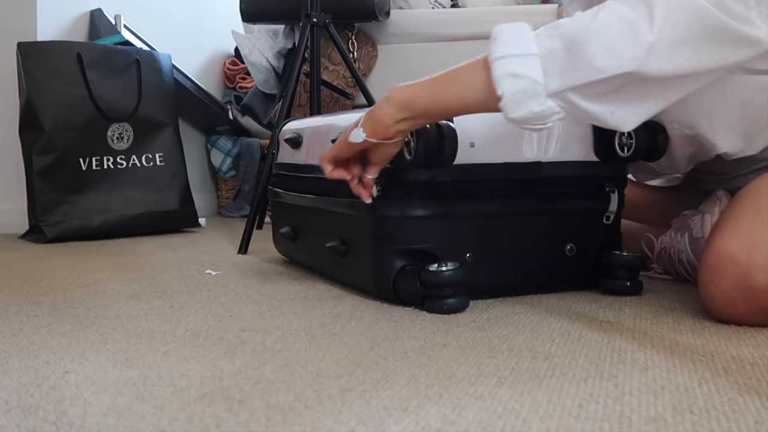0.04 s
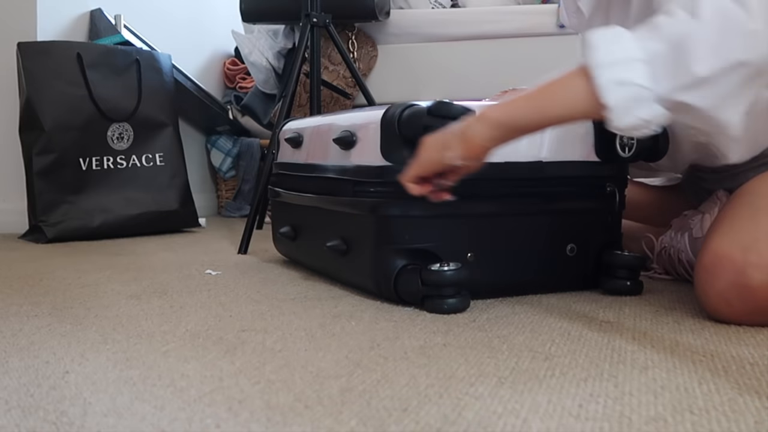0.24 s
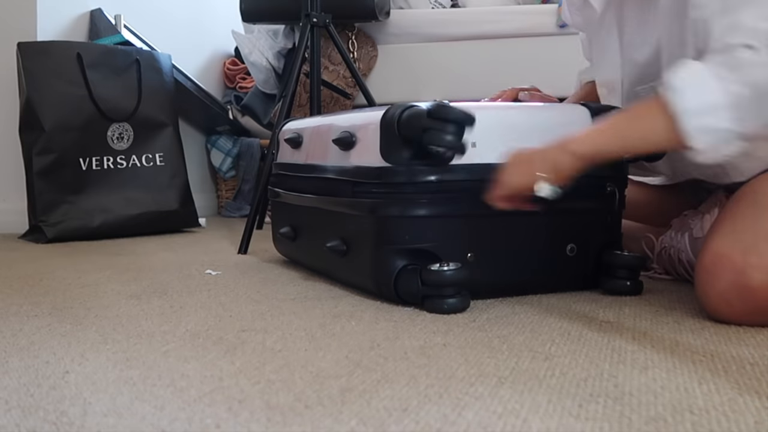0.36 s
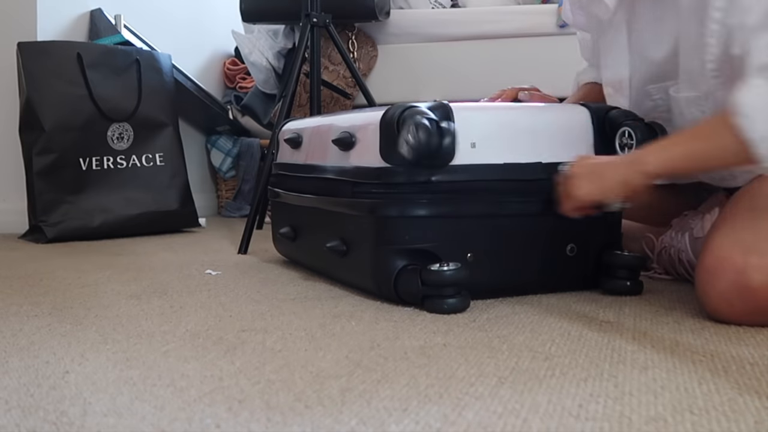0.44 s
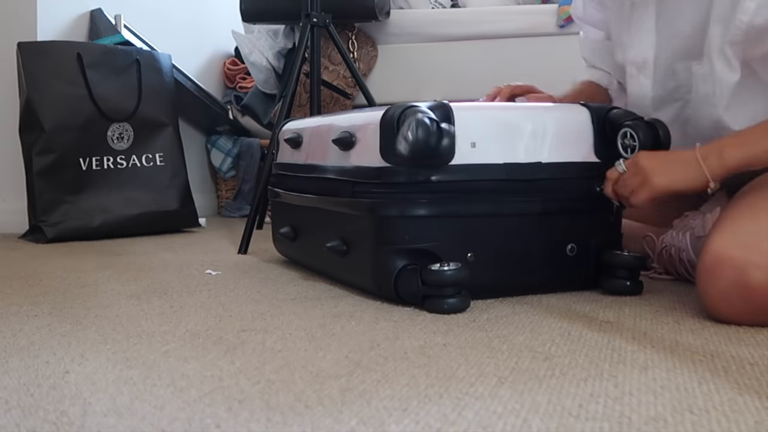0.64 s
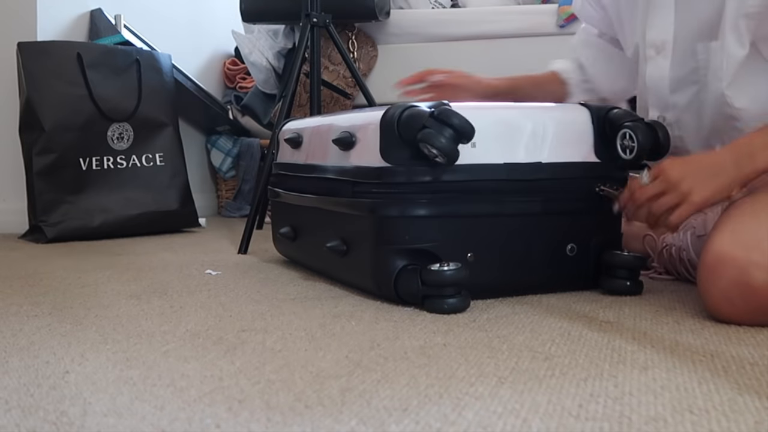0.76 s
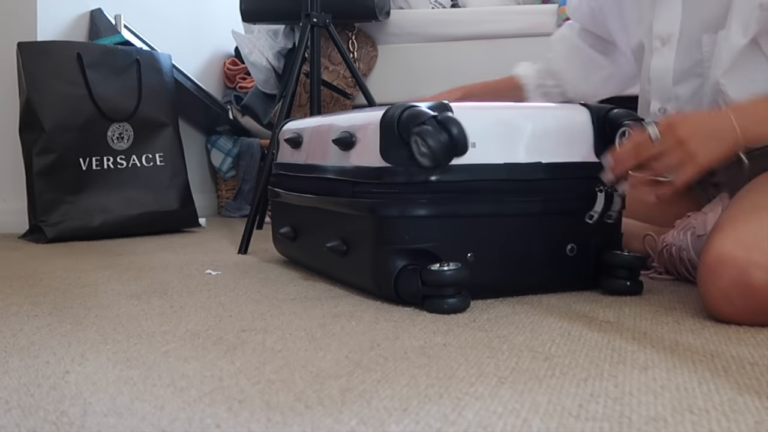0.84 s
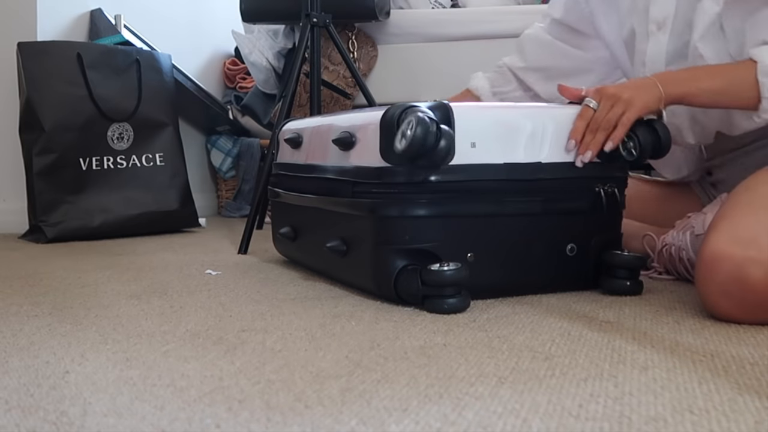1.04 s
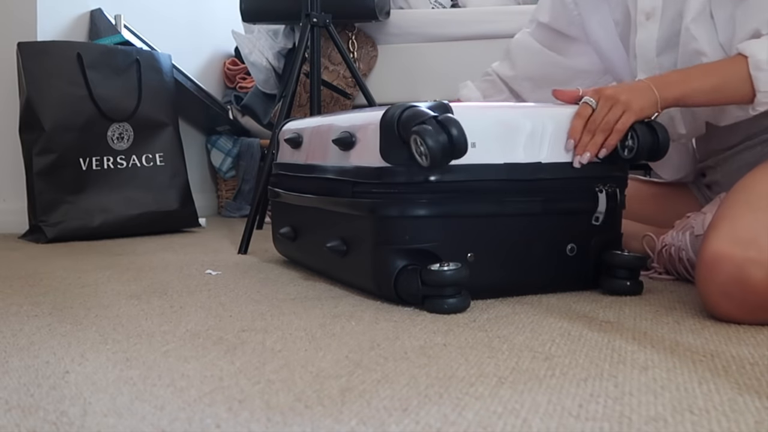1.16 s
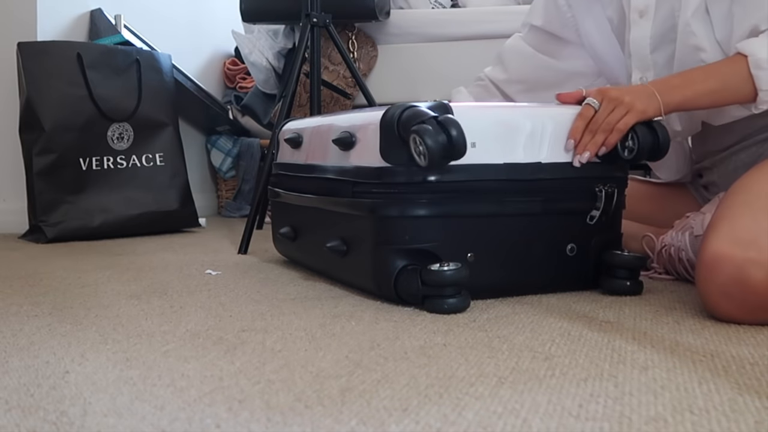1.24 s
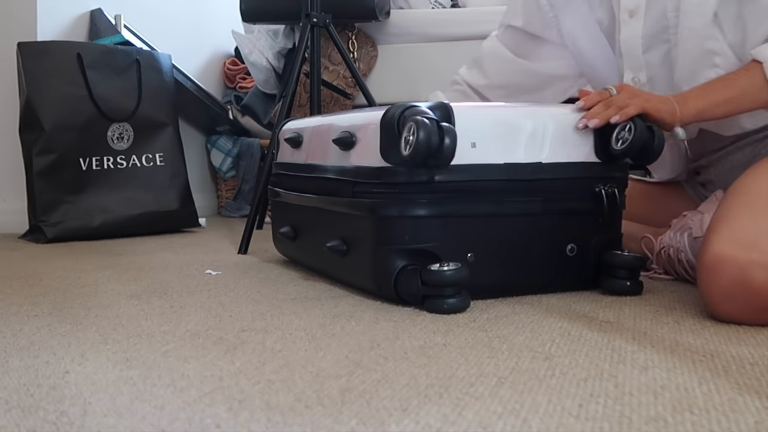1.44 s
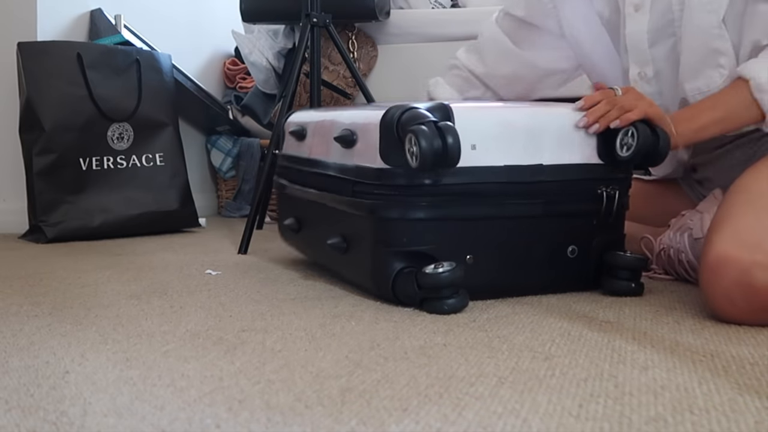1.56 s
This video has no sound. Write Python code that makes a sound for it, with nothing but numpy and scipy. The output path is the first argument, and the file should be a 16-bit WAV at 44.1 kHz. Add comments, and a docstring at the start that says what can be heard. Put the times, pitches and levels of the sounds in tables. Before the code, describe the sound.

Close up in a small room, a hard-shell suitcase is zipped with a short, hollow rasp that speeds up twice. Light knocks, rubbing and a clink of the pull follow, ending with a brief wheel rattle.

```python
"""A hard-shell suitcase lies on the carpet of a small furnished room. A hand brushes and taps it,
and the metal pull of its zipper clinks. The slider then runs round the case in two quick surges,
tripping over the teeth: this periodic forcing makes the hollow shell sing at the tooth rate, while
the tape rasps. Afterwards hands bump, tap and rub the case, the pull clinks again, and last a
knocked wheel rattles. The room answers with a short reverberation."""
import sys
import numpy as np
from scipy import signal
from scipy.fft import rfft, irfft
from scipy.io import wavfile
from scipy.ndimage import uniform_filter1d

SR = 44100
rng = np.random.default_rng(int(sys.argv[2]) if len(sys.argv) > 2 else 0)


def wav_record(signal):
    """Record a signal, one row per channel, as 16-bit PCM in the file named by sys.argv[1]."""
    frames = np.transpose(np.atleast_2d(signal))
    bounded = np.clip(frames, -1, 1)
    # unit amplitude maps onto the largest positive 16-bit level
    quanta = np.round(bounded * 32767).astype(np.int16)
    wavfile.write(sys.argv[1], SR, quanta)


N = 70560

# Speed of the slider. Each row: time in seconds, teeth per second.
SLIDER_SPEED = [(0.24, 211), (0.272, 249), (0.33, 206.6), (0.362, 243), (0.385, 333), (0.413, 464),
                (0.441, 467), (0.449, 693), (0.466, 690), (0.485, 775), (0.503, 682), (0.526, 505),
                (0.545, 345), (0.568, 323), (0.589, 560), (0.604, 490), (0.62, 335), (0.68, 237)]
# Force of the pull. Each row: time in seconds, then relative levels in dB of buzz, overtones and rasp.
PULL_FORCE = [(0.235, -48, -13, -36.5), (0.27, -27, -1.5, -43.5), (0.32, -27, 4.5, -43),
              (0.355, -22, 1.5, -43), (0.372, -17.5, 5.5, -40), (0.43, -16.5, 1.5, -40),
              (0.445, -17, 9.5, -32), (0.462, -11, 3.5, -27), (0.485, -14, 7.5, -32), (0.52, -18.5, 5, -30),
              (0.565, -19, -6, -35), (0.594, -13.5, 4, -27), (0.612, -19, -2, -33), (0.64, -29, -3, -40),
              (0.70, -58, 16, -57)]
# Spectra of a passing tooth and of the scraped tape. Each row: frequency in Hz, relative level in dB.
TOOTH_SPECTRUM = [(60, -25), (130, -3.5), (220, 3.5), (330, 0), (430, -1.5), (540, 7), (750, -3.5),
                  (970, 0), (1200, -22.5), (1550, -15.5), (1900, -35.5), (4000, -31), (8000, -79)]
RASP_SPECTRUM = [(100, -1.5), (900, 3), (1600, 6), (2200, 1.5), (3250, -5), (4100, -1.5), (5100, -17),
                 (7500, -17.5), (11000, -31)]
# Resonances that colour the zipper and the knocks. Each row: frequency in Hz, relative level # in dB.
RESONANCES = [(102, 4), (190, 5), (269, 14.5), (335, 9.5), (466, -0.5), (653, 7.5), (753, -11), (963, -7)]

# Clinks of the pull. Each row: start in seconds, level in dB, pitch in Hz, tilt in dB per octave.
CLINK_EVENTS = [(0.2079, -19.5, 2820, -10), (0.2246, -1.5, 2717, -14), (0.2712, -19, 2520, -0.5),
                (1.035, -29, 2505, -3), (1.0494, -14, 2510, 1), (1.0706, -16, 2466, 12.5)]
# Modes of the pull. Each row: multiple of the pitch, relative level in dB, T60 in seconds.
PULL_MODES = [(1.0, 0, 0.0081), (1.1, -7.5, 0.0016), (1.43, -14.5, 0.021), (4.4, -32, 0.0016)]
# Taps of slider, fingers and ring on the plastic.
# Each row: start in seconds, knock level in dB, snap level in dB, pitch of the struck spot in Hz.
TAP_EVENTS = [(0.0363, -12, -27, 1010), (0.2252, -5, -5.5, 2250), (0.626, -7, -5, 3540),
              (0.6512, -1.5, -16.5, 1970), (0.7065, -9.5, -15, 2180), (0.772, -1.5, -15.5, 1700),
              (0.779, -10, -9.5, 2880), (0.882, -20, -22.5, 3280), (0.946, -5.5, -8.5, 1450),
              (0.966, -15.5, -16, 1530), (1.0703, -4.5, -16, 1030), (1.081, -14, -18, 3460),
              (1.093, -13, -14, 2320), (1.131, -19, -15.5, 2870), (1.173, -15, -25, 935),
              (1.329, -19.5, -20.5, 1456), (1.372, -18, -13.5, 1900), (1.4967, -15, -18, 1550),
              (1.5141, -22, -6.5, 2550)]
# Spectra of a tap's knock and snap. Each row: frequency in Hz, relative level in dB.
KNOCK_SPECTRUM = [(50, -13.5), (200, -6), (450, 4.5), (800, 0), (1500, -8), (6000, -30), (15000, -46.5)]
SNAP_SPECTRUM = [(200, -11), (1000, 2.5), (1800, 4.5), (2600, -5), (4000, 1), (5200, -12.5), (8000, -10),
                 (15000, -54)]
# Soft bumps of the case. Each row: start in seconds, pitch in Hz, level in dB, T60 in seconds.
BUMP_EVENTS = [(0.513, 119.5, -21, 0.1), (0.608, 66, -23.5, 0.11), (0.626, 171.4, -30, 0.31),
               (0.775, 134, -30, 0.2), (0.789, 97.2, -30, 0.17), (0.946, 261, -16, 0.025),
               (0.947, 97, -26, 0.23), (1.009, 194, -15.5, 0.058), (1.021, 311, -17.5, 0.05),
               (1.032, 97.2, -23, 0.12), (1.038, 178.4, -19.5, 0.1)]
# Modes of a wheel. Each row: frequency in Hz, relative level in dB.
WHEEL_MODES = [(1350, -10), (1850, 3), (2520, 2)]
# Hands, sleeve and pull sliding over the case.
# Each row: start in seconds, length in seconds, level in dB, tilt in dB per octave.
RUB_EVENTS = [(0.029, 0.091, -45, -3.5), (0.194, 0.23, -40.5, -4), (0.235, 0.035, -44.5, 4),
              (0.696, 0.075, -43, -1), (0.996, 0.21, -45, -1.5), (1.066, 0.098, -38, -1),
              (1.299, 0.06, -48, -5), (1.366, 0.092, -47.5, 9.5), (1.427, 0.046, -45, 5.5),
              (1.468, 0.098, -45, 5.5)]
# Spectra of the rubbing and of the room tone. Each row: frequency in Hz, relative level in dB.
RUB_SPECTRUM = [(60, -3.5), (200, 5), (600, 9), (1200, 2), (2500, -0.5), (4200, -9.5), (5900, -11),
                (9000, -32), (15000, -73)]
ROOM_TONE_SPECTRUM = [(50, -8.5), (100, 3.5), (190, -1), (300, -6.5), (1200, -18), (10000, -33),
                      (15000, -46)]

# Decay of the room. Each row: frequency in Hz, T60 in seconds.
ROOM_DECAY = [(100, 0.47), (500, 0.24), (8000, 0.19)]
# Early reflections from furniture and wall. Each row: delay in seconds, level in dB.
REFLECTIONS = [(0.0035, -22), (0.0114, -18.5)]
# Balance of the microphone pair. Each row: frequency in Hz, left minus right in dB.
PAIR_BALANCE = [(150, 0), (700, -1.5), (8000, -0.5)]


def zipper(even_above_hz=350, tooth_db_per_octave=-6):
    """Forced vibration: one pulse per tooth drives the shell, so the pitch follows the slider's speed."""
    t = np.arange(N) / SR
    rate, = curve(SLIDER_SPEED)
    buzz_db, overtone_db, rasp_db = curve(PULL_FORCE)
    moving = uniform_filter1d(1. * (t > PULL_FORCE[0][0]) * (t < PULL_FORCE[-1][0]), size=300)
    # The hand's speed, and below its force, waver as the tape catches.
    teeth = np.cumsum(rate * (1 + 0.028 * waver(size=150))) / SR
    # Teeth scatter in timing and strength; a fast slider runs more evenly.
    slowness = 1 / (1 + (rate / even_above_hz) ** 6)
    shift, height = (np.interp(teeth, np.arange(len(v)), v) for v in rng.standard_normal((2, N // 20)))
    teeth += shift * np.interp(slowness, [0, 1], [0.021, 0.074])
    force = amp(np.tanh(height) * np.interp(slowness, [0, 1], [-1.5, 9.5]))
    phase = 2 * np.pi * teeth
    overtones = sum(amp(tooth_db_per_octave * np.log2(k / 2)) * np.cos(k * phase) for k in range(2, 7))
    pulses = force * (np.cos(phase) + amp(overtone_db) * overtones)
    buzz = steady(resonate(colour(pulses, TOOTH_SPECTRUM))) * amp(buzz_db + 1.5 * waver())
    return moving * (buzz + amp(rasp_db + 1.22) * tape_rasp(teeth))


def tape_rasp(teeth, grain_db=1, steady_share=0.75, decay_teeth=0.29):
    """Stick-slip friction: noise that catches every millisecond or so, with a puff at each tooth."""
    noise = rng.standard_normal(N)
    grain = amp(grain_db * unit(uniform_filter1d(rng.standard_normal(N), 50)))
    puffs = steady_share + (1 - steady_share) * np.exp(-(teeth % 1) / decay_teeth)
    return unit(colour(noise * grain * puffs, RASP_SPECTRUM))


def resonate(drive, t60_s=0.16, ring_db=-11):
    """Resonance: a set of damped modes adds its ringing to the drive."""
    t = np.arange(SR // 2) / SR
    decay = amp(-60 * t / t60_s)
    modes = sum(amp(db) * np.cos(2 * np.pi * hz * t) for hz, db in RESONANCES)
    response = modes * decay * 2 / decay.sum()
    return drive + amp(ring_db) * signal.fftconvolve(drive, response)[:N]


def clinks(rise_s=0.00014):
    """Free vibration: the pull strikes the slider and rings for milliseconds in inharmonic modes."""
    out, t = np.zeros(N), np.arange(SR // 20) / SR
    for start, db, hz, tilt in CLINK_EVENTS:
        # The tilt levels off half an octave above the pitch.
        ring = sum(amp(level + tilt * min(np.log2(ratio), 0.5)) * damped_sine(t, hz * ratio, t60)
                   for ratio, level, t60 in PULL_MODES)
        add(out, start, amp(db) * (1 - np.exp(-t / rise_s)) * ring)
    return out


def taps(scuff_gain=1.86, scuff_s=0.0027, spot_db=-3.5, spot_t60_s=0.015):
    """Impact: a blow with a short scuff excites a dull knock in the shell and a snap at the struck spot."""
    knocks, snaps, t = np.zeros(N), np.zeros(N), np.arange(SR // 20) / SR
    for start, knock_db, snap_db, hz in TAP_EVENTS:
        scuff = unit_energy(rng.standard_normal(len(t)) * np.exp(-t / scuff_s))
        blow = unit_energy((t == 0) + scuff_gain * scuff)
        spot = amp(spot_db) * unit_energy(damped_sine(t, hz, spot_t60_s))
        add(knocks, start, amp(knock_db) * blow)
        add(snaps, start, amp(snap_db) * unit_energy(colour(blow, SNAP_SPECTRUM) + spot))
    return resonate(colour(knocks, KNOCK_SPECTRUM)) + snaps


def bumps(rise_s=0.0048):
    """Damped oscillation: pushed and rocked, the case swings briefly at a low pitch."""
    out, t = np.zeros(N), np.arange(SR // 2) / SR
    for start, hz, db, t60 in BUMP_EVENTS:
        add(out, start, amp(db) * (1 - np.exp(-t / rise_s)) * damped_sine(t, hz, t60))
    return out


def wheel(start_s=1.5146, level_db=-33.5, rattle_t60_s=0.096, mode_t60_s=0.015):
    """Random excitation: a knocked wheel rattles in its fork, driving its modes until it settles."""
    out, t = np.zeros(N), np.arange(SR // 2) / SR
    ring = sum(amp(db) * damped_sine(t, hz, mode_t60_s) for hz, db in WHEEL_MODES)
    rattle = rng.standard_normal(len(t)) * amp(level_db - 60 * t / rattle_t60_s)
    add(out, start_s, signal.fftconvolve(rattle, unit_energy(ring)))
    return out


def rubs(crinkles_per_s=5000, spread_db=4, edge_s=0.0086, fade_db=-14):
    """Friction as shot noise: many tiny crinkles, a few of them large, swell quickly and fade."""
    out = np.zeros(N)
    for start, length, db, tilt in RUB_EVENTS:
        t = np.arange(0, length, 1 / SR)
        size = amp(spread_db * np.minimum(rng.exponential(1, len(t)), np.pi))
        crinkles = size * rng.choice([-1, 1], len(t)) * (rng.random(len(t)) < crinkles_per_s / SR)
        noise = colour(crinkles, [(hz, level + tilt * np.log2(hz)) for hz, level in RUB_SPECTRUM])
        edges = np.clip(np.minimum(t, length - t) / edge_s, 0, 1)
        add(out, start, amp(db) * unit(noise * edges * amp(fade_db * t / length)))
    return out


def room(x, tail_db, onset_s=0.004, width=0.6, mono_below_hz=390):
    """Reverberation: direct sound, two reflections and a diffuse tail that widens above the bass."""
    hz, t, spectra = signal.stft(rng.standard_normal((2, SR // 2)), SR, nperseg=256)
    spectra[1] *= (hz / (hz + mono_below_hz))[:, None]
    decay = amp(-60 * t / read(ROOM_DECAY, hz)[:, None])
    tails = signal.istft(spectra * decay, SR, nperseg=256)[1]
    tails *= np.arange(tails.shape[1]) / SR > onset_s
    mid, side = signal.fftconvolve(x[None], tails / np.linalg.norm(tails[0]), axes=1)[:, :N]
    early = np.zeros(N)
    for delay, db in REFLECTIONS:
        add(early, delay, amp(db) * x)
    return x + early + amp(tail_db) * np.array([mid + width * side, mid - width * side])


def room_tone():
    """Stationary noise: a quiet background, strongest in the bass."""
    return amp(-47) * unit(colour(rng.standard_normal(N), ROOM_TONE_SPECTRUM))


def amp(db):
    """Decibels as an amplitude ratio."""
    return 10 ** (np.asarray(db) / 20)


def unit(x):
    """Normalisation to rms 1."""
    return x / np.sqrt(np.mean(x ** 2) + 1e-20)


def unit_energy(x):
    """Normalisation to energy 1."""
    return x / np.linalg.norm(x)


def damped_sine(t, hz, t60):
    """A single mode, falling 60 dB in t60 seconds."""
    return amp(-60 * t / t60) * np.sin(2 * np.pi * hz * t)


def smooth(x, size):
    """Triangular moving average."""
    return uniform_filter1d(uniform_filter1d(x, size), size)


def steady(x):
    """Normalisation of the running level to rms 1."""
    return x / np.sqrt(abs(smooth(x ** 2, 600)) + 1e-12)


def waver(size=300):
    """Slow random fluctuation of rms 1."""
    return unit(smooth(rng.standard_normal(N), size))


def read(table, hz):
    """Interpolation on a log-frequency axis."""
    freqs, values = np.transpose(table)
    return np.interp(np.log(hz + 1), np.log(freqs + 1), values)


def curve(table):
    """Interpolation in time: one value per sample for each column."""
    times, *columns = np.transpose(table)
    return [np.interp(np.arange(N) / SR, times, column) for column in columns]


def add(mix, start_s, sound):
    """Superposition of a sound on the mix."""
    part = mix[round(start_s * SR):][:len(sound)]
    part += sound[:len(part)]


def colour(x, spectrum, size=4096):
    """Minimum-phase filtering with unit energy and the given spectral shape."""
    log_gain = np.log(amp(read(spectrum, abs(np.fft.fftfreq(size, 1 / SR)))))
    response = np.fft.ifft(np.exp(np.conj(signal.hilbert(log_gain)))).real[:size // 2]
    return signal.fftconvolve(x, unit_energy(response))[:len(x)]


def scene():
    """Superposition: zipper, clinks and handling reverberate in the room; the bumps arrive direct."""
    tone = room_tone()
    zipping = room(zipper(), tail_db=-13.5)
    clinking = room(clinks(), tail_db=-15.5)
    handling = room(taps() + wheel() + rubs() + tone, tail_db=-7)
    return zipping + clinking + handling + bumps()


def record(dry, treble_phase_rad=2.53, above_hz=5440, span_hz=800, cutoff_hz=15700):
    """Phase difference: treble reaches a close microphone pair out of phase; a low-pass limits the band."""
    hz = np.fft.rfftfreq(2 * N, 1 / SR)
    phase = treble_phase_rad / (1 + np.exp((above_hz - hz) / span_hz))
    left_gain = amp(read(PAIR_BALANCE, hz) / 2) * np.exp(-1j * phase / 2)
    pair = irfft(rfft(dry, 2 * N) * np.array([left_gain, 1 / left_gain]))[:, :N]
    low_pass = signal.firwin(511, cutoff_hz, window=("kaiser", 9), fs=SR)
    return signal.oaconvolve(pair, low_pass[None], "same")


dry = scene()
out = record(dry)
wav_record(out)
```